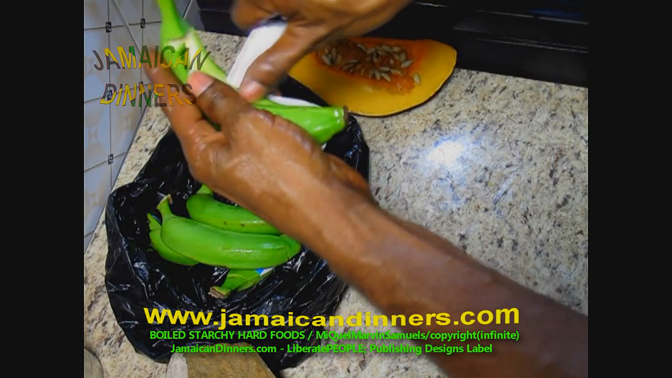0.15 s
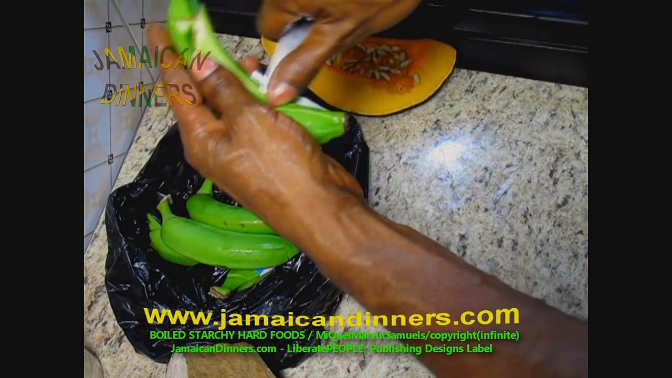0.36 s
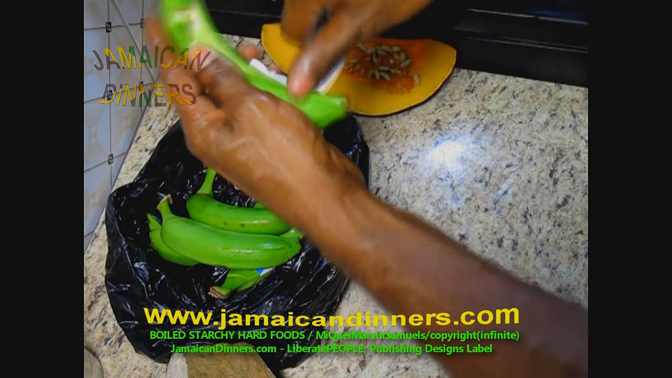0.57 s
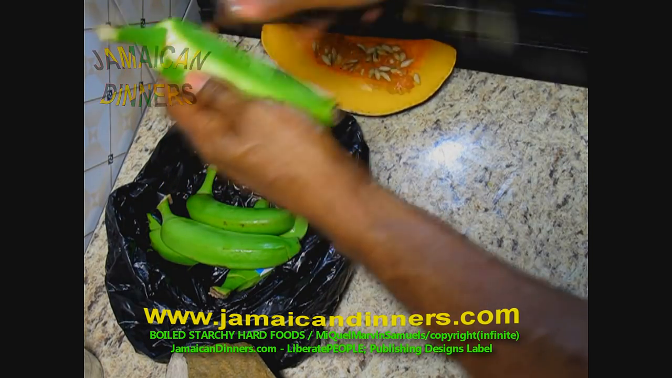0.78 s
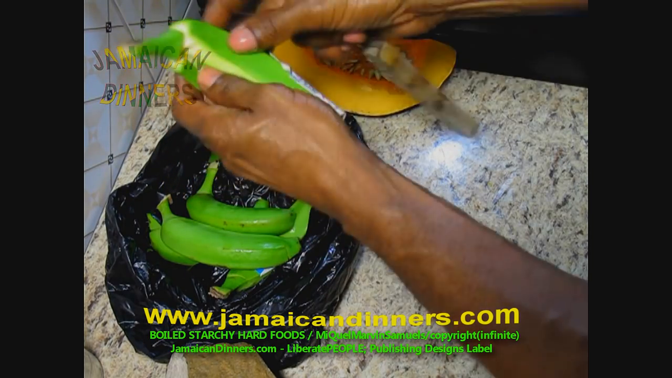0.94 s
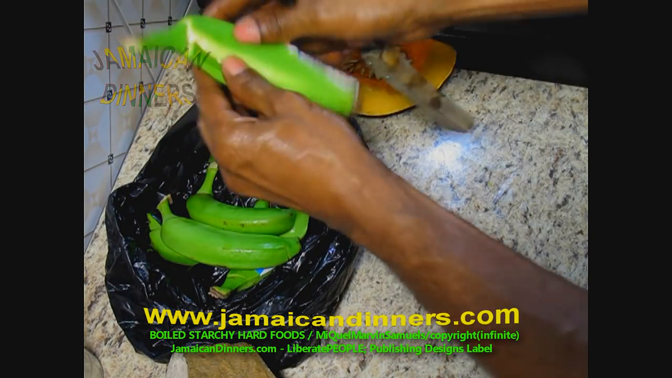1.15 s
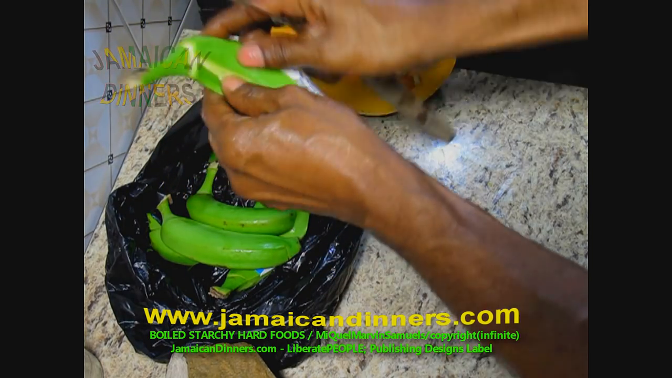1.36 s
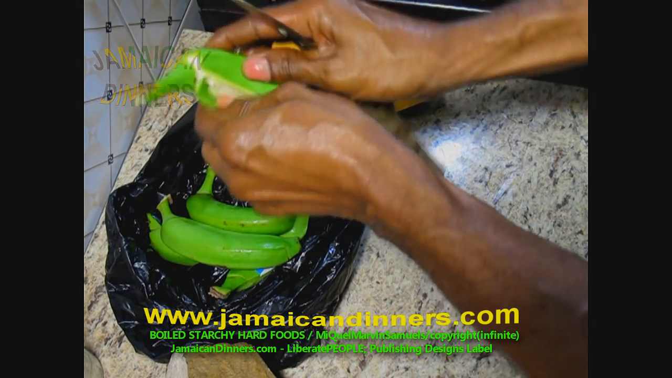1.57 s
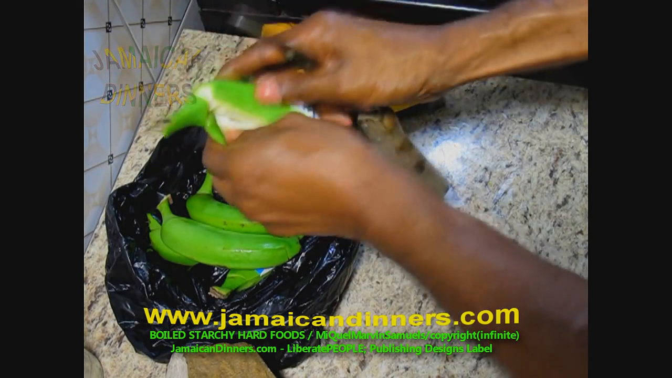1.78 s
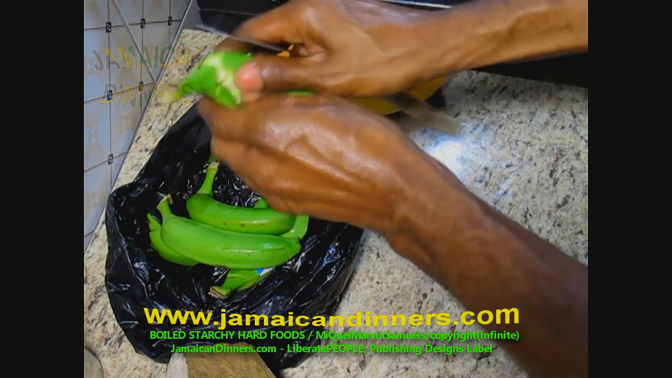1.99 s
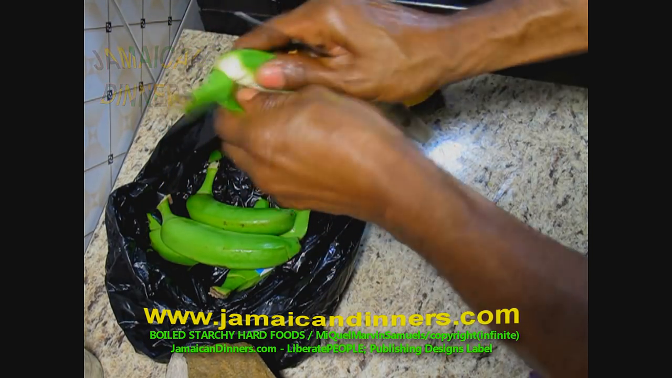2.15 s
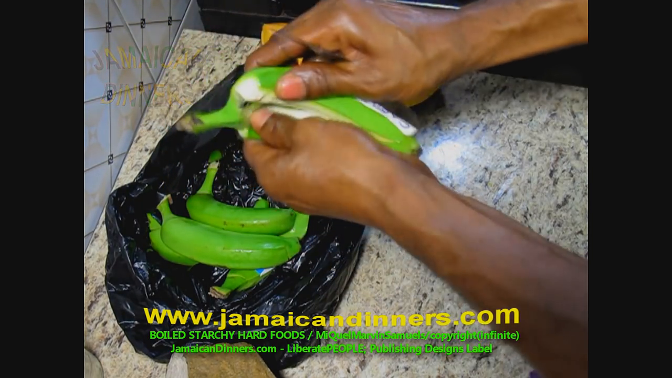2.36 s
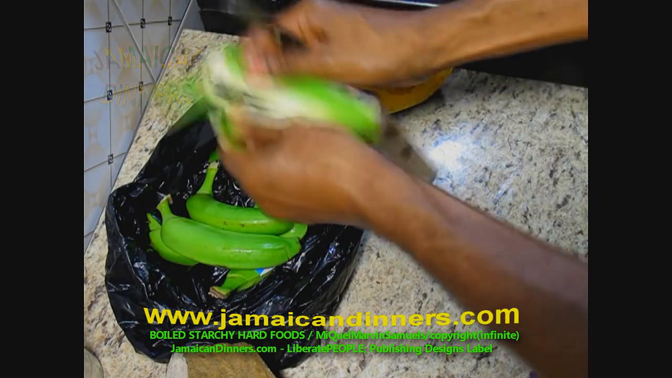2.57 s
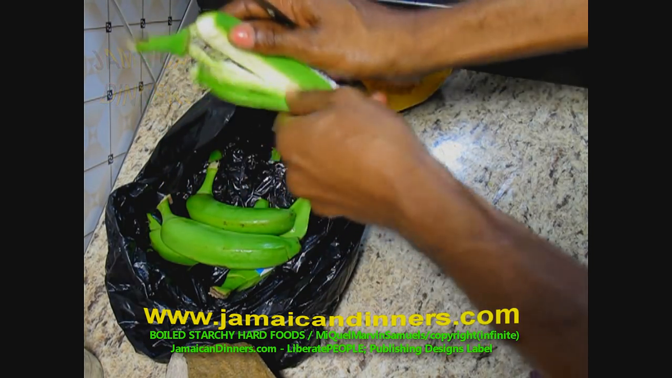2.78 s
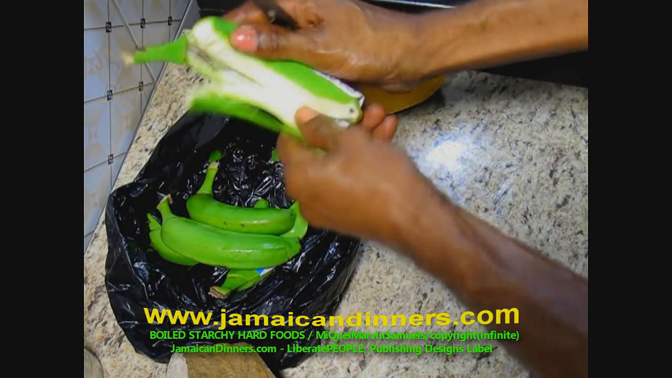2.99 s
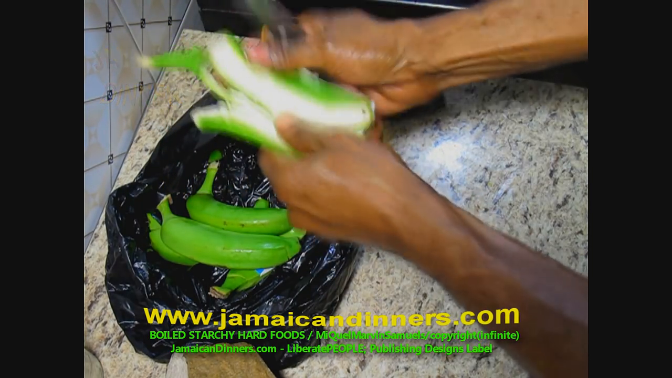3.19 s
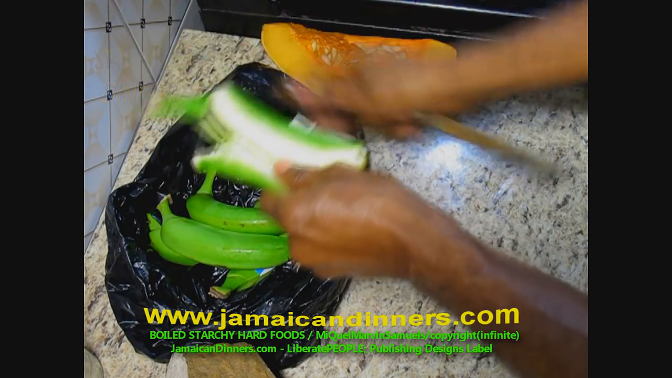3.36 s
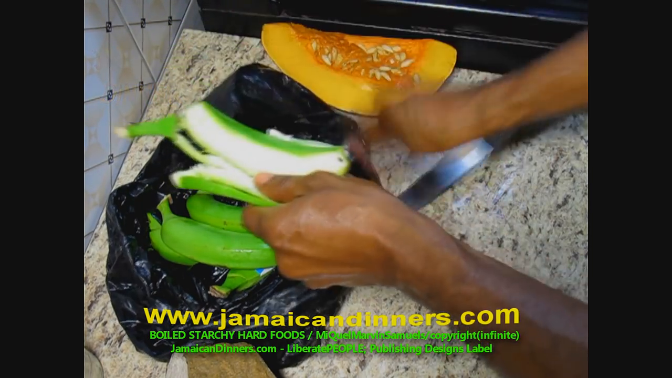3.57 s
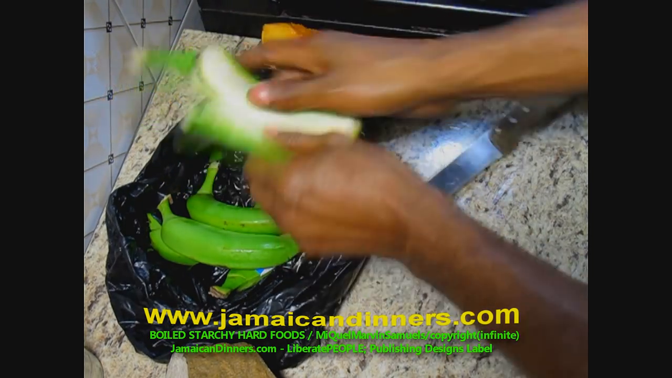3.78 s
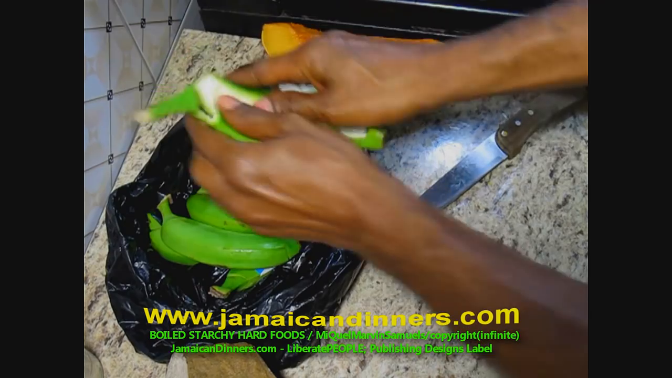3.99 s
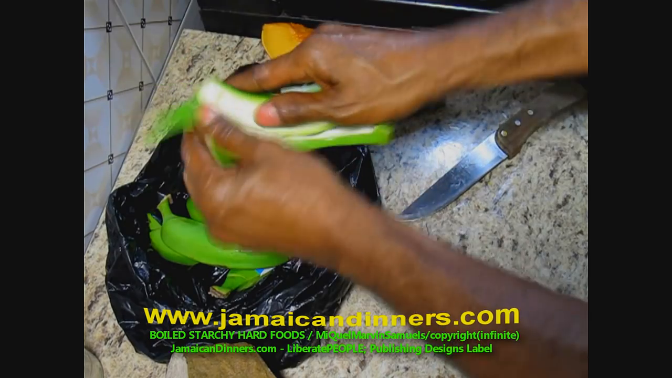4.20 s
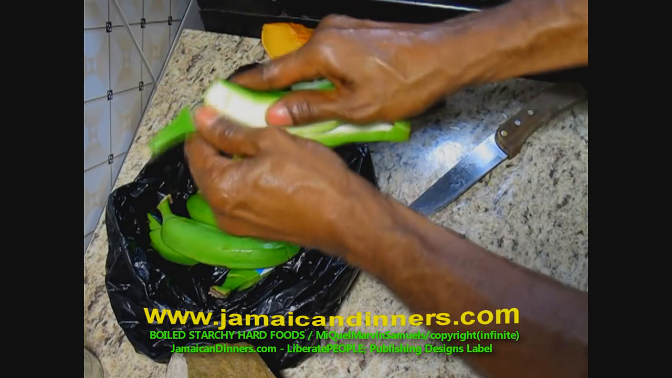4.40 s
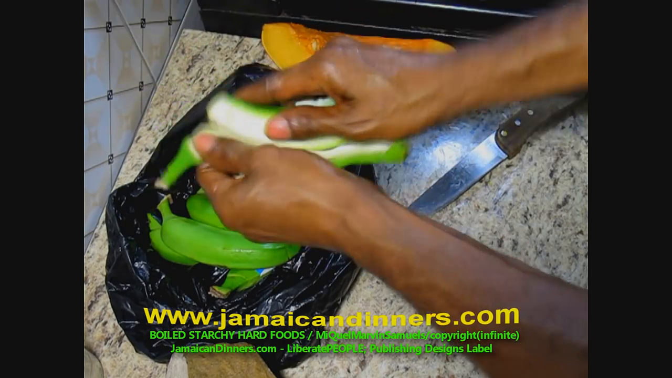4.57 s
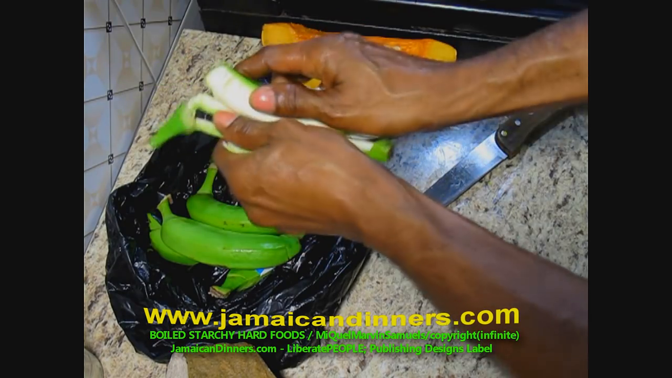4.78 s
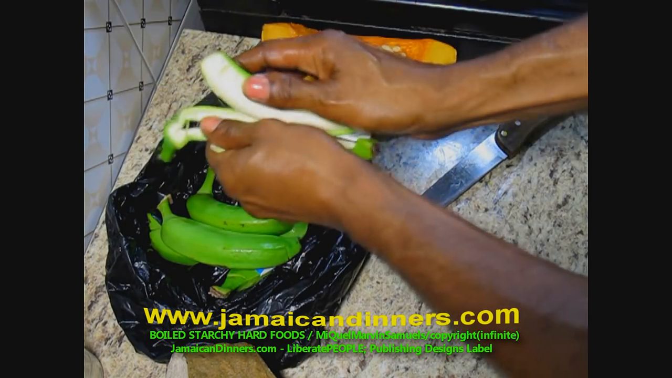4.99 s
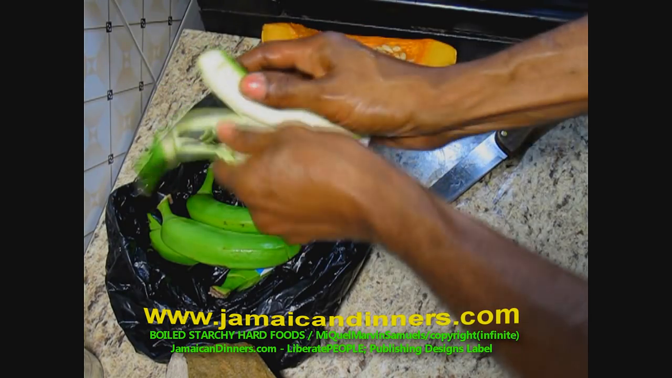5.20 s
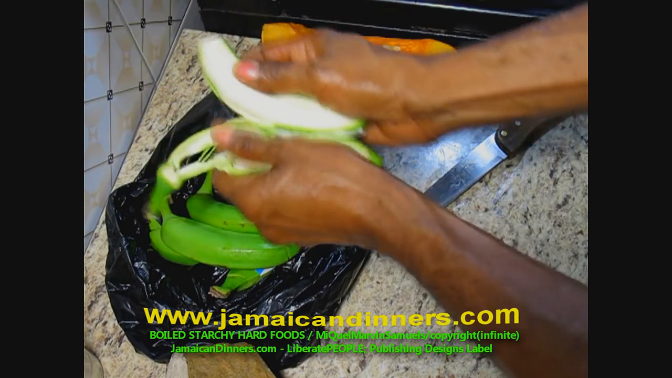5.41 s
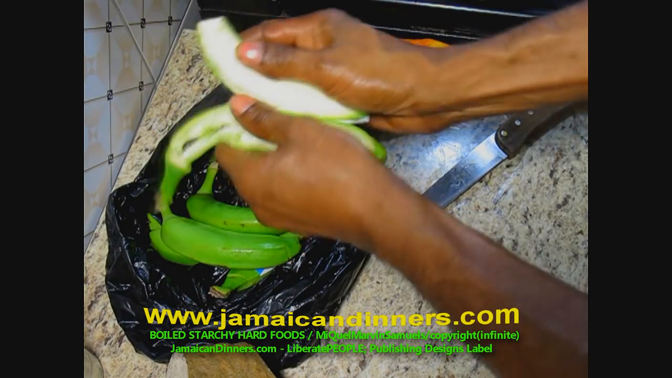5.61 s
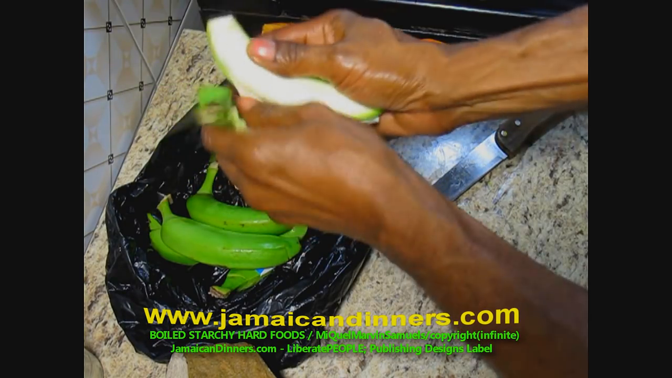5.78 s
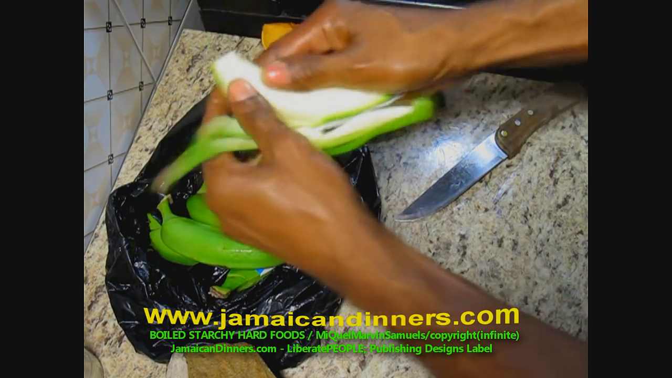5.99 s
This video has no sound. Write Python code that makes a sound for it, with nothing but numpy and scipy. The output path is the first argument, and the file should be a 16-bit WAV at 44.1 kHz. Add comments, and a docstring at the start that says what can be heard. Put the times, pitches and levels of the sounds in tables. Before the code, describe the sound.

A faint, steady fridge hum and soft room air fill a small kitchen. In the first second, fingertips slip softly on a green banana, its thick skin starts to rip quietly, and a knife clicks lightly at about 0.8 seconds. From 1.5 to 3.3 seconds the skin tears in short, moist, crackling pulls, dotted with crisp snaps and dull thocks as strips come free, strongest near 2.3 and 3.3 seconds. At 3.6 seconds comes the loudest sound: a wooden-handled knife knocks onto a stone counter, slides and chatters with a brief metallic ring, settling by 4 seconds. Peeling resumes at 4.4 seconds with more rips and snaps, building to a strong crack and thock around 5.4 seconds. One small rip follows near 5.8 seconds. Everything sounds close, with a short room echo.

```python
"""A fridge hums in a small kitchen while a green banana is peeled by hand over a stone counter.
The thick skin starts to rip in runs of tiny fibre breaks, fingertips slip and a knife clicks lightly.
The skin gives way in crisp snaps, and strips come free with a dull thock. Midway the wooden-handled
knife is put down: it knocks, slides and rings as it clatters to rest. Then the peeling goes on."""
import sys
import numpy as np
from scipy import signal
from scipy.fft import rfft, irfft
from scipy.io import wavfile
from scipy.ndimage import uniform_filter1d

SR = 44100
rng = np.random.default_rng(int(sys.argv[2]) if len(sys.argv) > 2 else 0)


def waveform_to_disk(signal):
    """Save audio, clipped to [-1, 1], as 16-bit WAV at the path in sys.argv[1]."""
    frames = np.transpose(np.atleast_2d(signal))
    scaled = np.clip(frames, -1, 1) * 32767
    samples = np.round(scaled).astype(np.int16)
    wavfile.write(sys.argv[1], SR, samples)


N = 266805
TIME = np.arange(N) / SR

# Pulls on the skin: start/s, length/s, relative level/dB, swell/dB, flap against crackle/dB, flap f/Hz
SKIN_PULLS = [(0.052, 0.09, -56, -2, -4.5, 2260), (0.207, 0.17, -62.5, -7, -3.5, 2250),
              (0.501, 0.047, -46.5, 2.5, -7, 2360), (0.968, 0.03, -53, -3, -15, 3530),
              (1.513, 0.11, -52.5, 1, -20, 3240), (1.609, 0.1, -42, 6, -23, 3120),
              (1.743, 0.03, -38.5, -2, -11, 3230), (2.156, 0.037, -44.5, 4, -12, 2700),
              (2.253, 0.049, -38.5, 8, -10.5, 2700), (2.332, 0.13, -43, 0, -11, 2200),
              (2.502, 0.075, -39.5, -6, -8, 2270), (2.65, 0.12, -60, -2, -4.5, 2770),
              (2.931, 0.04, -43, 5, -8.5, 2540), (2.99, 0.059, -33.5, -7.5, -10, 2400),
              (3.206, 0.034, -53.5, 1, -5, 3770), (3.253, 0.032, -30, -9, -6, 3750),
              (4.42, 0.08, -50.5, 7, -13, 2900), (4.519, 0.13, -41, -6, -18.5, 2280),
              (4.879, 0.047, -36, 5.5, -18, 2190), (4.945, 0.12, -45.5, -2, -22, 2260),
              (5.24, 0.035, -51, 8, -6, 2350), (5.298, 0.08, -31.5, 2, -12, 2430),
              (5.828, 0.037, -43.5, 4, -17, 2430)]
# Crisp snaps of the skin, and one light knife click (at 0.79 s):
# t/s, relative crack level/dB, relative pop level/dB, fading time/ms
SNAPS_AND_CLICK = [(0.671, -41.5, -56, 2.3), (0.7873, -42, -48, 1.2), (1.1498, -71, -53, 1.8),
                   (1.252, -72, -55, 1.5), (1.615, -36.5, -68, 6.6), (1.6457, -37, -69, 2.2),
                   (1.7331, -25, -42, 0.29), (1.7455, -38, -43.5, 1.5), (1.944, -47, -52, 4.3),
                   (2.1795, -32, -41, 1.5), (2.2557, -32, -44, 1.6), (2.3168, -26.5, -28, 1.6),
                   (2.3958, -30.5, -52, 1.7), (2.4212, -35.5, -44, 0.65), (2.4937, -32.5, -63, 3.5),
                   (2.562, -32, -37, 0.85), (2.9891, -30, -39, 1.3), (3.0146, -24.5, -35.5, 0.35),
                   (3.0229, -31.5, -38, 2.7), (3.0788, -39, -55, 1.5), (3.117, -43, -68, 0.79),
                   (3.241, -42, -57, 1.1), (3.247, -26, -29, 1.3), (3.2684, -21, -26.5, 1.2),
                   (3.56, -38, -45, 11), (3.567, -44, -51, 2.1), (4.4308, -41, -61, 2),
                   (4.494, -42, -50.5, 1.6), (4.528, -38, -57, 1.2), (4.5766, -33, -51, 3),
                   (4.6006, -40, -62, 1.6), (4.6452, -38, -53, 1.9), (4.8642, -38, -67, 1.2),
                   (4.9403, -34, -45, 0.75), (4.9561, -30.5, -51, 1.4), (4.9758, -30.5, -59, 2),
                   (5.0099, -25.5, -35, 0.74), (5.044, -34.5, -63, 0.96), (5.1434, -35, -45, 1.4),
                   (5.1667, -36.5, -39, 0.57), (5.2068, -35, -40.5, 3.8), (5.266, -41, -64, 0.81),
                   (5.293, -24, -34, 3.9), (5.356, -31, -28.5, 1.1), (5.3607, -22, -24, 0.77),
                   (5.9997, -45.5, -73, 3.5)]
# Tone colour of breaking fibres: f/Hz, level/dB
FIBRE_COLOUR = [(200, -9.5), (900, -1.5), (1900, -16.5), (3300, 3.5), (5800, 1.5), (9000, 2.5),
                (16000, 4.5)]
# Tone colour of the knife touching stone: f/Hz, level/dB
KNIFE_COLOUR = [(30, -39), (170, -32), (330, -12.5), (550, 3), (800, 8), (1300, 3.5), (1800, 6.5),
                (2600, 0.5), (3200, -3), (4500, 0), (7400, -7), (10000, -2.5), (16000, 7)]


def undb(db):
    """Turn decibels into a gain."""
    return 10 ** (np.asarray(db) / 20)


def unit(x):
    """Scale to an average (rms) size of 1."""
    return x / np.sqrt(np.mean(x ** 2))


def add(track, s, sound):
    """Mix a sound into a track from time s."""
    i = int(s * SR)
    track[i:i + len(sound)] += sound[:N - i]


def response(points, centre_hz=None, octaves=1, depth_db=0, size=2048):
    """Make a filter from (f/Hz, level/dB) points, with a broad hump if a centre is given."""
    log_hz = np.log2(np.maximum(np.fft.rfftfreq(size, 1 / SR), 1))
    hz, db = np.transpose(points)
    db = np.interp(log_hz, np.log2(hz), db)
    if centre_hz is not None:
        hump = np.exp(-.5 * ((log_hz - np.log2(centre_hz)) / octaves) ** 2)
        db = db + depth_db * (hump - 1)
    # these steps make the filter ring only after a hit, never before it
    cepstrum = irfft(np.log(undb(db)))
    cepstrum[1:size // 2] *= 2
    cepstrum[size // 2 + 1:] = 0
    return irfft(np.exp(rfft(cepstrum)))


def through(x, ir):
    """Pass a sound through a filter; ir is the filter's answer to a single click."""
    return signal.oaconvolve(x, ir)[:len(x)]


def wander(per_s):
    """A smooth random drift with a spread near 1."""
    hold = int(SR / per_s)
    steps = np.repeat(rng.standard_normal(N // hold + 2), hold)
    return unit(uniform_filter1d(steps, hold)[:N])


def burst(ms, after, first, size=2048):
    """One sharp click of size first, then a quickly dying train of random ones."""
    t_ms = 1000 * np.arange(size) / SR
    train = rng.standard_normal(size) * np.exp(-t_ms / max(ms, .1))
    train *= after * np.sqrt(abs(ms)) / np.linalg.norm(train)
    train[0] = first
    return train


def at_level(x, db):
    """Give a short sound the energy of 4 ms at this level."""
    return x * undb(db) * np.sqrt(.004 * SR) / np.linalg.norm(x)


def stroke(start, length, db, swell_db, attack_s, release_s):
    """Loudness of one movement: it rises quickly, swells or sags evenly, then dies away."""
    t = TIME - start
    hold = undb(db + swell_db * (np.clip(t / length, 0, 1) - .5))
    return hold * np.clip(1 + t / attack_s, 0, 1) * np.exp(-np.maximum(t - length, 0) / release_s)


def fridge_and_air():
    """Steady kitchen air and a slightly wavering hum."""
    # Tone colour of the air: f/Hz, level/dB
    air_colour = [(20, 1.5), (50, -0.5), (75, -0.5), (130, -1), (200, -4.5), (330, -4), (600, -8.5),
                  (1200, -9.5), (3000, -13.5), (6000, -18.5), (10000, -21), (16000, -11)]
    # Fridge hum and a thin electrical whine: f/Hz, level/dB
    hum_tones = [(99.6, -59), (210, -74.5), (5880, -76)]
    air = undb(-55.5) * unit(through(rng.standard_normal(N), response(air_colour)))
    hum = np.zeros(N)
    for hz, db in hum_tones:
        gain = undb(db + 0.61 * wander(9.0))
        phase = 2 * np.pi * np.cumsum(hz + 0.54 * wander(6.03)) / SR
        hum += gain * unit(np.sin(phase))
    return air + hum


def fibre_breaks(per_s, scatter_db, hiss):
    """Random breaks of uneven size, bunched as the skin sticks and slips, over a fine wet hiss."""
    sizes = undb(scatter_db * np.minimum(rng.exponential(1, N), 4))
    breaks = (rng.random(N) < per_s / SR) * sizes * rng.choice([-1, 1], N)
    return (unit(breaks) + hiss * rng.standard_normal(N)) * undb(4.1 * wander(190))


def flap(hz, base_hz=2274):
    """The hollow ring of a flap of skin; a short, stiff one rings higher."""
    # Tone colour of a flap pitched at base_hz: f/Hz, level/dB
    flap_colour = [(200, -28), (700, -26), (1200, -4), (1650, -2), (2000, 7.5), (2550, 1.5), (3300, -4.5),
                   (4500, -10.5), (9000, -25)]
    return response([(f * hz / base_hz, db) for f, db in flap_colour])


def tearing(lead_s=.012):
    """Each pull breaks fibres and makes the sap fizz; the freed flap of skin adds a hollow ring."""
    breaks = fibre_breaks(per_s=3200, scatter_db=3.5, hiss=0.33)
    fizz = unit(through(rng.standard_normal(N), response(FIBRE_COLOUR, 9800, octaves=0.77, depth_db=18)))
    crackle = unit(through(breaks, response(FIBRE_COLOUR))) + undb(-3.5) * fizz
    tugs = unit(fibre_breaks(per_s=1500, scatter_db=3.5, hiss=0.27))
    effort = undb(-67 + 4.8 * wander(12))  # fingers never quite rest on the skin
    hollow = np.zeros(N)
    for start, length, db, swell_db, flap_db, hz in SKIN_PULLS:
        pull = stroke(start, length, db, swell_db, attack_s=0.013, release_s=0.011)
        ring = flap(hz)
        effort += pull
        hollow += undb(flap_db) * through(pull * tugs, ring / np.linalg.norm(ring))
    rise = np.linspace(0, 1, int(lead_s * SR)) ** 2  # the crackle swells just before a snap or click
    for s, crack_db, *_ in SNAPS_AND_CLICK:
        add(effort, s - lead_s, undb(crack_db - 10) * rise)
    return undb(-4.5) * effort * crackle + undb(-1.5) * hollow


def fingers(size=2048):
    """Fingertips give short, soft squeaks on the waxy skin."""
    # Slips and bumps on the fruit: t/s, relative level/dB, f/Hz
    slips = [(0.253, -44, 1030), (0.261, -41.5, 656), (0.355, -41, 970), (0.494, -43.5, 447),
             (0.54, -42, 1470)]
    out, t = np.zeros(N), np.arange(size) / SR
    for s, db, hz in slips:
        tone = np.sin(2 * np.pi * hz * t) * np.exp(-t / 0.0017)
        slip = through(burst(2.0, after=1.4, first=0.73), tone)
        add(out, s, undb(db - 4.0) * slip / np.abs(slip).max())
    return out


def snaps_and_click():
    """The skin snaps with a crack and a pop of its flap; one light knife click is made the same way."""
    out = np.zeros(N)
    for s, crack_db, pop_db, ms in SNAPS_AND_CLICK:
        hz = 5520 * 2 ** (0.033 * (crack_db - pop_db))  # the more pop, the duller the crack
        crack = through(burst(ms, after=3.8, first=0.43), response(FIBRE_COLOUR, hz, depth_db=13))
        *_, flap_hz = min(SKIN_PULLS, key=lambda pull: abs(pull[0] + pull[1] / 2 - s))  # nearest pull
        pop = through(burst(ms, after=2.0, first=1.0), flap(flap_hz))
        add(out, s, at_level(crack, crack_db - 1.55) + at_level(pop, pop_db - .6))
    return out


def thocks():
    """A whole strip of skin lets go and jolts the firm fruit, which gives a dull thock."""
    # Tone colour of the flesh: f/Hz, level/dB
    flesh_colour = [(100, -17), (280, 0.5), (480, -1.5), (1150, 2.5), (1700, 14.5), (4000, -26)]
    # Strips coming free: t/s, level/dB
    jolts = [(1.7337, -52.5), (2.318, -44), (3.0153, -53), (3.2484, -37.5), (3.269, -44), (5.009, -65),
             (5.3565, -41), (5.3612, -32.5)]
    out, flesh = np.zeros(N), response(flesh_colour)
    for s, db in jolts:
        thock = through(burst(4.1, after=5.0, first=0.35), flesh)
        add(out, s, at_level(thock, db))
    return out


def knife(size=24576, thump_s=3.644):
    """The handle knocks dully, the blade slaps, chatters and slides; all of it rings the same tones."""
    # Knife hitting the counter: t/s, relative level/dB, centre f/Hz, chatter time/ms
    blows = [(3.5927, -3.5, 1660, 1.4), (3.603, -19, 1400, 1.4), (3.6164, -16.5, 1400, 1.7),
             (3.6470, -4, 6270, 1.5), (3.6482, -6.5, 5900, 1.1), (3.7342, -17, 960, 0.91),
             (3.7404, -14, 1830, 2.6), (3.7707, -9, 3350, 2.7), (3.7801, -9.5, 6050, 2.9),
             (3.7841, -12, 3700, 3.6), (3.8367, -19, 990, 4.6), (3.8611, -14, 6400, 3.4),
             (3.8711, -4.5, 3500, 1.5), (3.882, -17, 3600, 1.3), (3.9171, -20, 1430, 4.7),
             (3.9256, -9.5, 5750, 3.3), (3.945, -19, 2460, 12), (3.977, -22, 3240, 3.9),
             (4.0069, -27, 1610, 0.34), (4.0100, -16.5, 5200, 2.5)]
    # Ringing of handle, blade and counter: f/Hz, relative level/dB, 60 dB fading time/s
    ring_tones = [(169, -7, .55), (708, -5, 0.13), (879, -3, 0.15), (1030, -14, 0.17), (1140, -3.5, 0.25),
                  (1445, -10, 0.17), (1630, -1.5, .12), (1810, -4, 0.089), (1880, -6, 0.09),
                  (2700, -2, .13), (3232, 1, .15), (3495, -2, 0.11), (3770, -14, 0.043), (4180, 2, 0.1),
                  (4620, -21, .13), (5560, -7, 0.2), (6080, 4, 0.13), (7920, 2, 0.15), (9840, 9, .06)]
    contact, t = knife_sliding(), np.arange(size) / SR
    for s, db, hz, ms in blows:
        blow = through(burst(ms, after=1.45, first=0.83), response(KNIFE_COLOUR, hz, depth_db=18))
        add(contact, s, at_level(blow, db - 8.0))
    ring = sum(undb(db) * np.sin(2 * np.pi * hz * t) * undb(-60 * t / fade_s)
               for hz, db, fade_s in ring_tones)
    # one short, low thump sounds with the blade's loudest slap
    thump = np.zeros(N)
    add(thump, thump_s, undb(-33) * np.sin(2 * np.pi * 70 * t) * np.exp(-t / 0.0031))
    return contact + undb(-50.0) * through(contact, ring) + thump


def knife_sliding():
    """Grit of the stone catches the sliding blade and shakes the handle."""
    # Slides between blows: start/s, length/s, relative level/dB, swell/dB, handle against blade/dB
    slides = [(3.616, 0.024, -26.5, 7.5, -12.5), (3.687, 0.031, -37, 9, -35), (3.743, 0.042, -38, -7.5, 13),
              (3.788, 0.086, -40.5, 2, 6.5), (3.88, 0.092, -29.5, -2, -3), (4.01, 0.02, -43, -8, 5)]
    # Tone colour of the rocking handle: f/Hz, level/dB
    handle_colour = [(30, -14), (100, -17.5), (170, -2), (280, -3), (400, -0.5), (750, 1), (1550, 1),
                     (3000, -7), (7000, -17.5)]
    grit = rng.standard_normal(N) * undb(3.8 * wander(300))
    blade = unit(through(grit, response(KNIFE_COLOUR, 7340, depth_db=14.5)))
    handle = unit(through(grit, response(handle_colour)))
    out = np.zeros(N)
    for start, length, db, swell_db, handle_db in slides:
        slide = stroke(start, length, db, swell_db, attack_s=0.019, release_s=0.0057)
        out += slide * (blade + undb(handle_db) * handle)
    return undb(-4) * out


def room(x, size=32768):
    """Echoes from one place in the kitchen: tiles and cupboards answer early, the bass lingers longest."""
    t = np.arange(size) / SR
    low_pass = signal.butter(2, 450, fs=SR, output="sos")
    bass = signal.sosfilt(low_pass, rng.standard_normal(size)) * undb(-60 * t / 0.65)
    bright = rng.standard_normal(size) * undb(-60 * t / 0.23)
    tail = (bass + bright) * np.clip(t / 0.0012, 0, 1)
    bounces = rng.standard_normal(size) * (rng.random(size) < 2500 / SR)
    early = bounces * (t > .0007) * np.exp(-t / 0.0085)
    echoes = undb(-8.0) * tail / np.linalg.norm(tail) + undb(-5.5) * early / np.linalg.norm(early)
    echoes[0] = 1  # the direct sound
    return through(x, echoes)


def scene():
    """The hands drift between two places, so their echoes keep changing; the knife lands in a third."""
    peeling = tearing() + snaps_and_click() + thocks() + fingers()
    place = .5 + .5 * np.tanh(2 * wander(2.996))
    hands = room(peeling * place) + room(peeling * (1 - place))
    return (hands + room(knife()) + fridge_and_air())[None]


def record(dry, ceiling=.62, top_hz=15800):
    """A small microphone with a treble peak and a dull top; the hardest knocks are rounded off."""
    # Tone colour of the microphone: f/Hz, level/dB
    microphone_colour = [(20, -2), (7000, 2), (8800, 3.5), (10300, 6), (11000, -2), (11450, -9.5),
                         (11780, -24), (12150, -13.5), (13000, -9.5), (15500, -18)]
    sound = through(dry[0], response(microphone_colour))
    rounded = sound / (1 + (sound / ceiling) ** 4) ** .25
    low_pass = signal.ellip(8, .2, 70, top_hz, fs=SR, output="sos")
    return signal.sosfilt(low_pass, rounded)[None]


dry = scene()
out = record(dry)
waveform_to_disk(out)
```